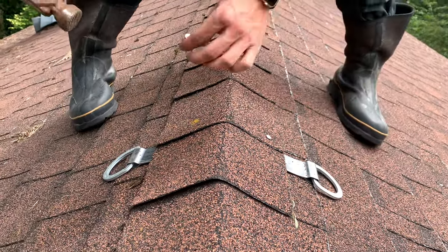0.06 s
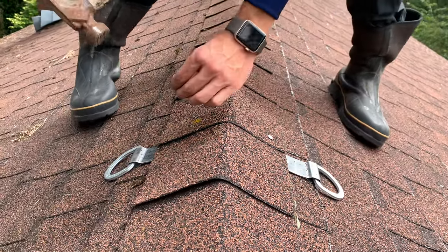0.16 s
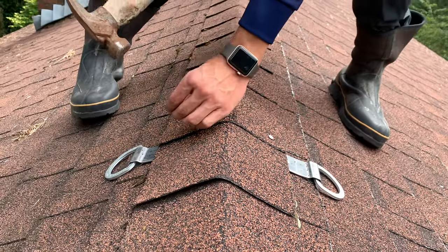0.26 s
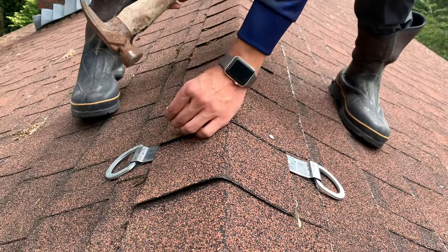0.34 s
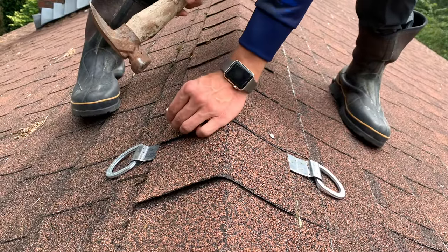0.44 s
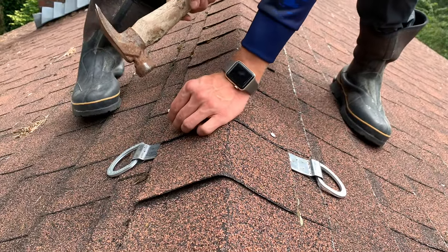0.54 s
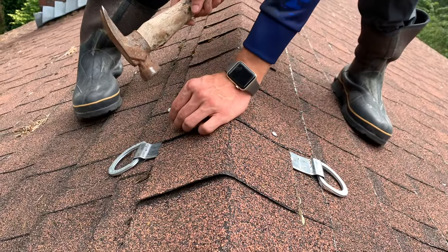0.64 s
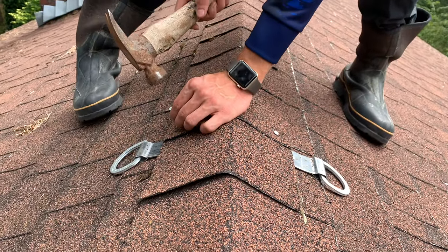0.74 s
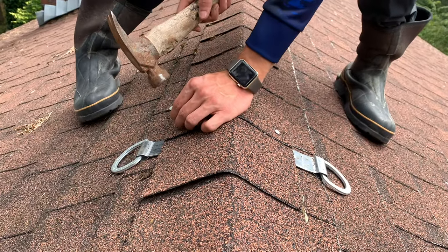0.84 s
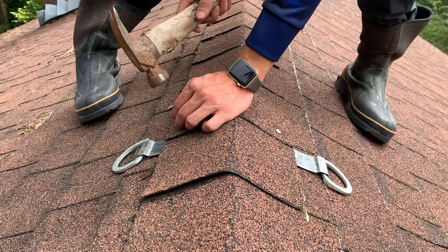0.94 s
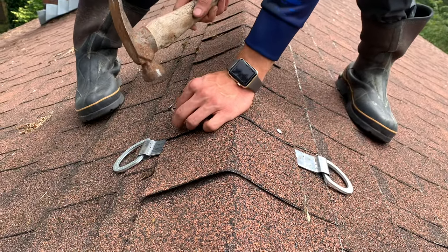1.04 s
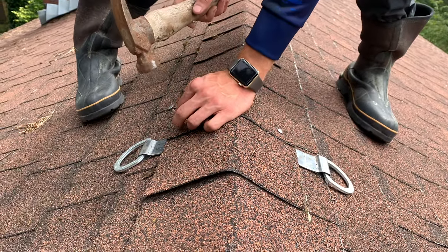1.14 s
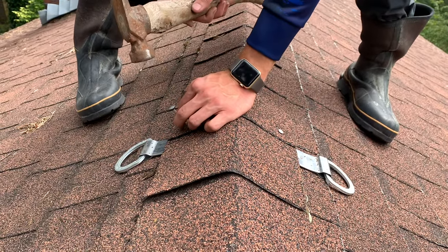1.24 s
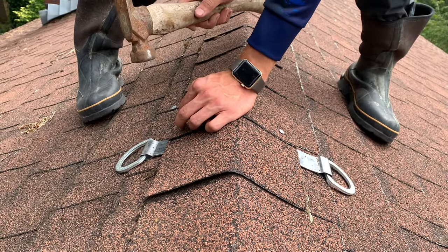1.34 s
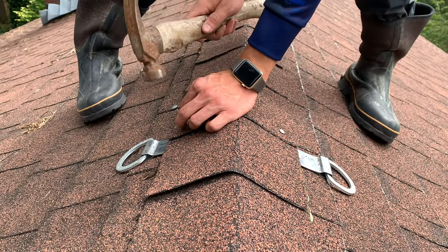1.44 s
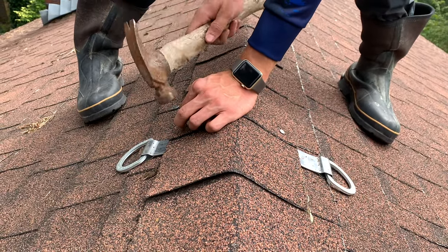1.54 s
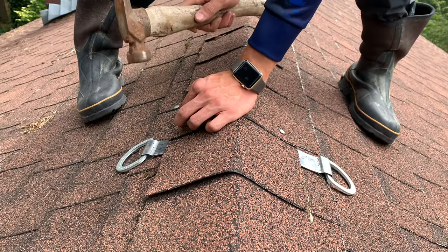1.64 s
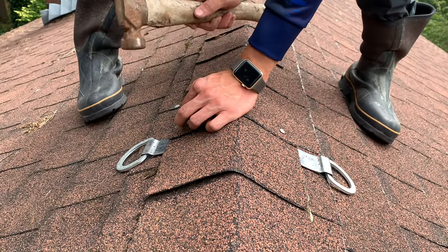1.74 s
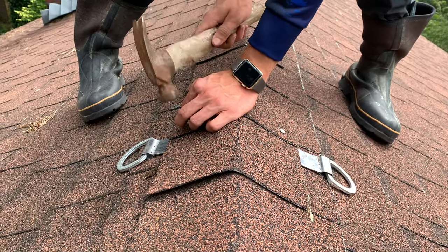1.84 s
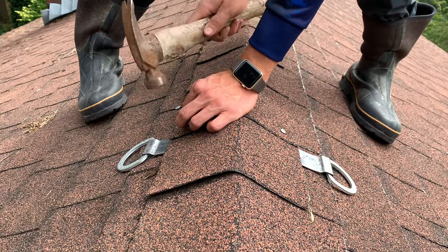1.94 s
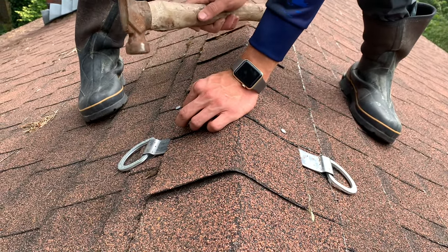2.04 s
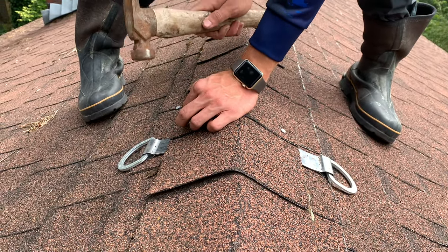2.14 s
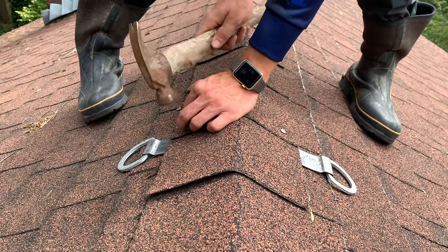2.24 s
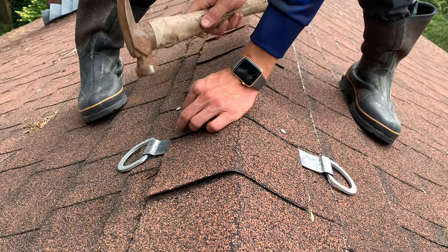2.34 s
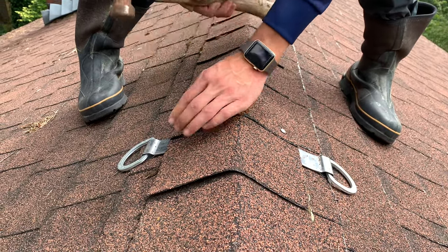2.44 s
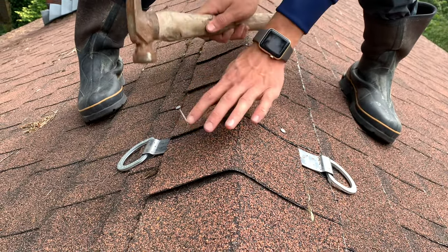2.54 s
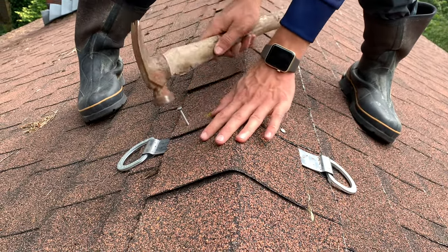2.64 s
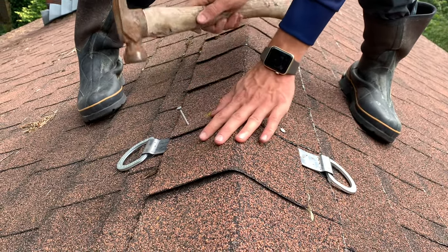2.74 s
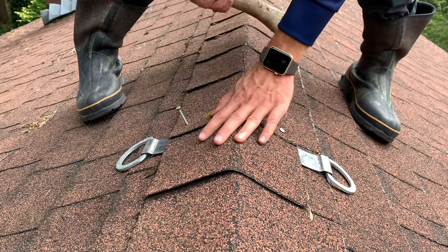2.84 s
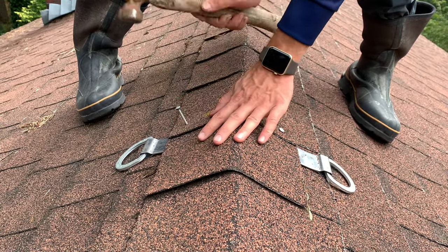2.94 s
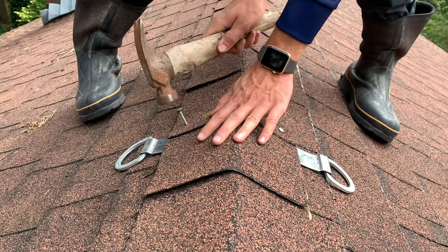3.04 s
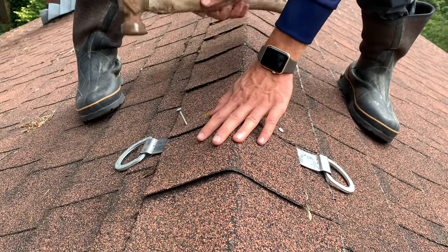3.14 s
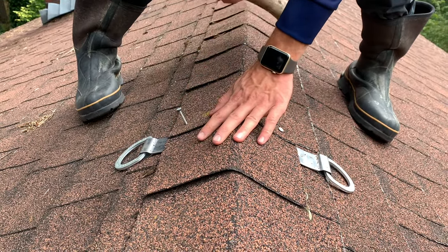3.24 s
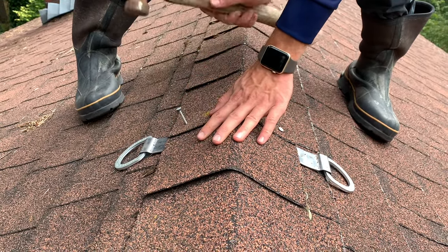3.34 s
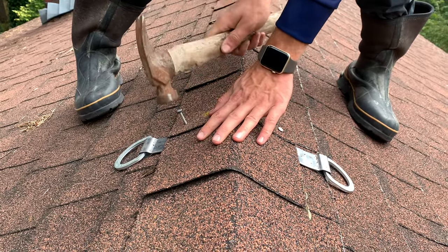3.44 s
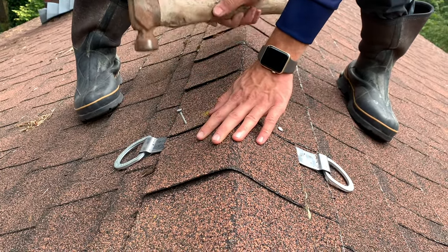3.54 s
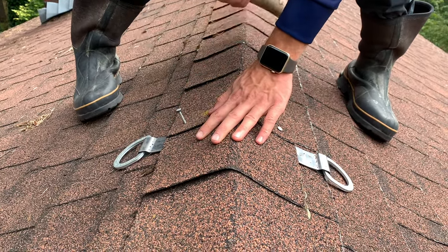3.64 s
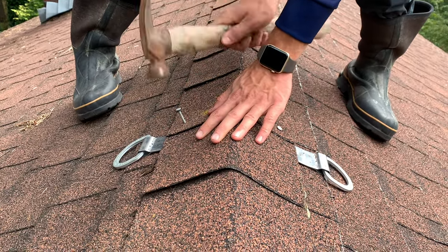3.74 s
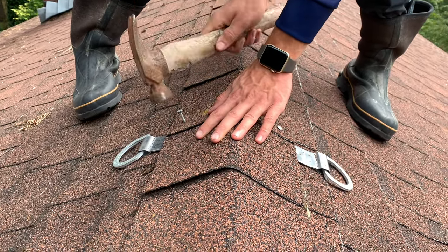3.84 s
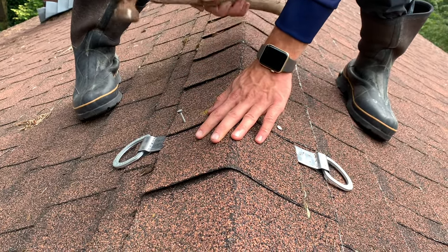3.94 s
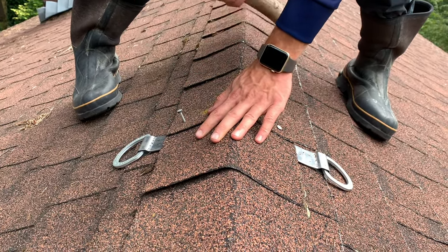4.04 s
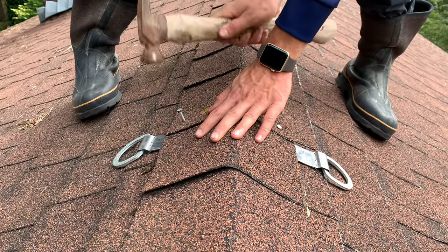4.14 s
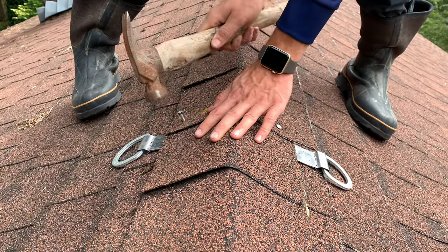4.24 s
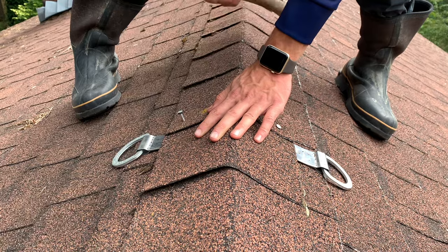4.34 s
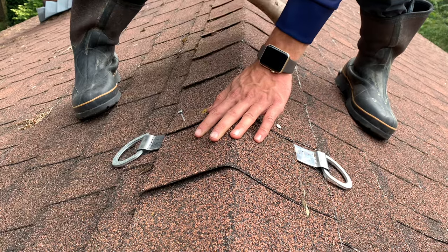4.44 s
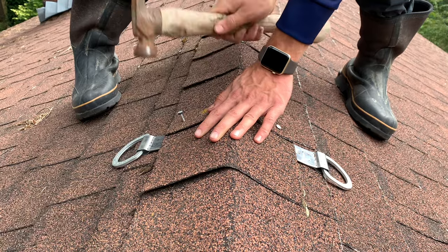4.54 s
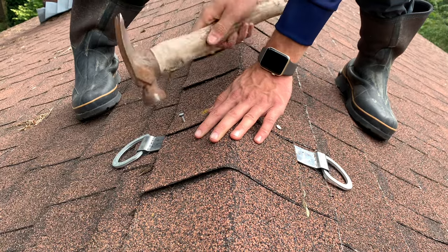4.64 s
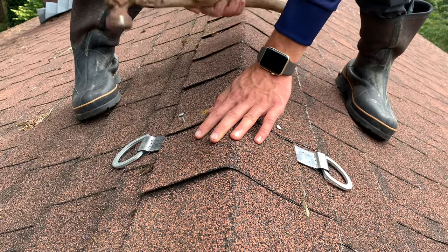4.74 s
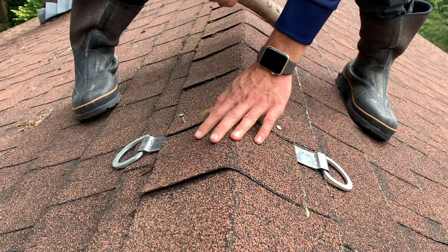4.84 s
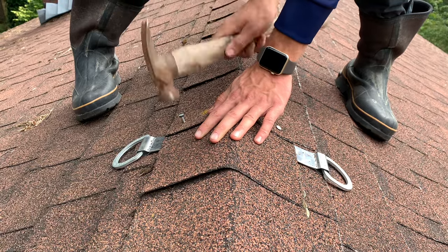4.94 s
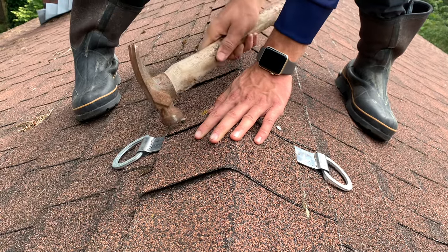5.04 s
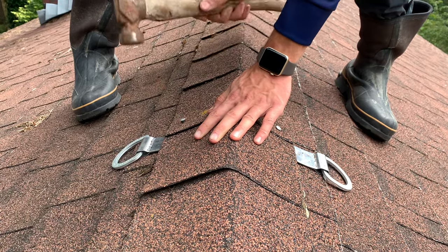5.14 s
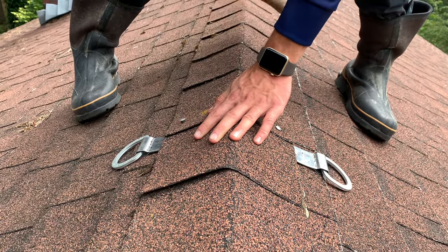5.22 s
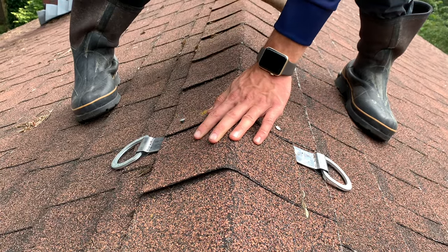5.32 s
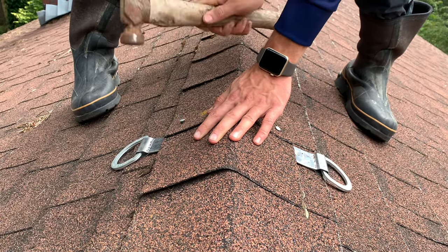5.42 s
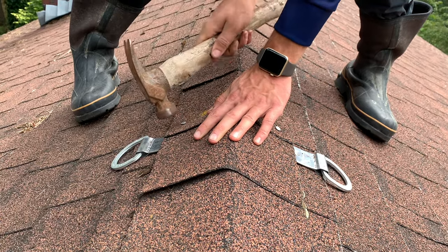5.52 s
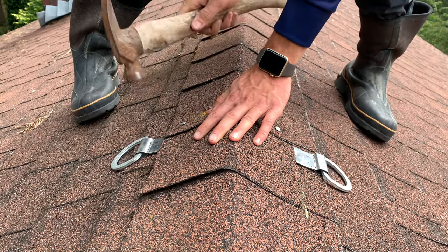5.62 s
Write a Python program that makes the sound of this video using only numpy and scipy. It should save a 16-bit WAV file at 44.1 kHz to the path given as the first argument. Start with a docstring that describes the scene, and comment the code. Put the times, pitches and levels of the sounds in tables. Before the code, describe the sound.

A hand scrapes over gritty roof shingle with small crackles and clicks. A steel hammer then taps a nail lightly and goes on striking at a steady pace, eleven hits in all. Each has a sharp metallic crack and a hollow wooden thump, the harder ones ringing briefly. The work is heard up close in still outdoor air, with very faint birds far away.

```python
"""On a roof in still air, a nail is driven through asphalt shingle into a plywood deck.
Five taps set it, six full blows sink it. Each blow cracks steel on steel and sends a bending wave
through the deck, whose bass arrives last as a falling thump. The roofer shifts his weight, a hand
scuffs over the gritty shingle, and small birds whistle far off."""
import sys
import numpy as np
from scipy import signal
from scipy.fft import rfft, irfft
from scipy.io import wavfile

SR = 44100
rng = np.random.default_rng(int(sys.argv[2]) if len(sys.argv) > 2 else 0)


def store_wav(level_fs):
    """Save 16-bit WAV to argv[1]."""
    pcm = np.round(np.clip(np.atleast_2d(level_fs), -1, 1) * 32767)
    wavfile.write(sys.argv[1], SR, pcm.T.astype(np.int16))


N = 250513
TIME = np.arange(N) / SR
SHOT = 2 ** 15   # samples in a one-shot
AGE = TIME[:SHOT]   # seconds since its trigger
APART = np.array([[1], [-1]])   # left up, right down


def from_db(db):
    """Decibels to gain."""
    return 10 ** (np.asarray(db) / 20)


def unit_rms(x):
    """Scale to rms 1."""
    return x / np.sqrt(np.mean(x ** 2) + 1e-20)


def unit_burst(x):
    """Scale a burst to the energy of 10 ms at rms 1."""
    return unit_rms(x) * np.sqrt(0.01 * SR / x.shape[-1])


def at_hz(points, hz):
    """Read a curve on a log-frequency axis."""
    known, values = np.transpose(points)
    return np.interp(np.log(hz + 1e-9), np.log(known), values)


def add(out, s, sound):
    """Mix a sound in at time s."""
    start = max(round(s * SR), 0)
    out[:, start:start + sound.shape[-1]] += sound[..., :max(N - start, 0)]


def bins(size=SHOT):
    """Frequencies of a real FFT."""
    return np.fft.rfftfreq(size, 1 / SR) + 1e-6


def band(centre_hz, width_hz):
    """Gain curve of a flat-topped resonance."""
    hz = bins()
    return 1 / np.sqrt(1 + ((hz ** 2 - centre_hz ** 2) / (hz * width_hz)) ** 4)


def noise(gain, alike, size=SHOT):
    """Stereo noise with a gain and a left-right correlation per frequency; rms 1."""
    mid, side = rfft(rng.standard_normal((2, size)))
    alike = np.clip(alike, -1, 1)
    stereo = np.sqrt(1 + alike) * mid + np.sqrt(1 - alike) * side * APART
    return unit_rms(irfft(gain * stereo, size))


def wander(rate_hz, alike, size=SHOT):
    """Low-passed noise to modulate with."""
    return noise(1 / (1 + (bins(size) / rate_hz) ** 2), alike, size)


def flicker(rate_hz, depth_db):
    """A gain that jumps about at random; rms 1."""
    return unit_rms(from_db(depth_db * np.clip(wander(rate_hz, 0.98)[0], -2, 2)))


def swell(rise_s, t60):
    """Envelope: quick attack, exponential decay."""
    return (1 - np.exp(-AGE / rise_s)) * from_db(-60 * np.minimum(AGE / t60, 4))


def hold(rise_s, length_s):
    """Envelope of a contact: quick attack, brief hold, release."""
    return (1 - np.exp(-AGE / rise_s)) * np.exp(-np.minimum(AGE / length_s, 10) ** 2)


# stereo image of diffuse sound: f/Hz, left-right correlation/0-1
CORRELATION = [(60, 0.91), (130, 0.93), (290, 0.7), (640, 0.47), (1400, 0), (7000, 0.32)]


def diffuse(eq, size=SHOT):
    """Noise from all around: nearly mono in the bass, wide higher up."""
    hz = bins(size)
    return noise(from_db(at_hz(eq, hz)), at_hz(CORRELATION, hz), size)


# EQ of the ambience: f/Hz, level/dB
AIR_EQ = [(26, -26.5), (45, -5.5), (108, 0), (265, -11.5), (464, -16), (1450, -25.5), (1770, -33),
          (2250, -25), (2800, -34), (3240, -25.5), (4900, -32.5), (6730, -35.5), (7410, -37.5),
          (13300, -51), (15000, -52.5)]


def still_air():
    """A faint, steady, bass-heavy bed of open air."""
    return from_db(-51) * diffuse(AIR_EQ, N)


# whistle cues: t/s, length/s, target note f/Hz, scoop/share of the note, level/dB
WHISTLE_CUES = [(2.062, 0.07, 2370, .01, -68.5), (2.707, 0.25, 4060, .05, -67.5),
                (3.192, .15, 2260, 0.04, -72), (3.2, 0.11, 5580, 0.026, -71.5),
                (3.298, 0.32, 3510, .03, -69), (3.673, 0.066, 4540, 0, -66), (5.165, 0.42, 4015, 0.1, -65)]


def whistling_birds():
    """Thin whistles scoop up toward a note, blurred by the trees."""
    out = np.zeros((2, N))
    scoop_s = 0.21
    for s, length, note_hz, scoop, db in WHISTLE_CUES:
        age = np.arange(int(length * SR)) / SR
        pitch = note_hz * (1 - scoop * np.maximum(1 - age / scoop_s, 0))
        tone = np.sin(2 * np.pi * np.cumsum(pitch) / SR)
        blur = .7 + .3 * wander(rate_hz=56, alike=0)[:, :len(age)]
        fade = np.sin(np.pi * age / length) ** 0.25
        add(out, s, from_db(db + 6.5) * fade * blur * tone)
    return out


# breakpoints of the buzzing song: t/s, f/Hz, level/dB
BUZZ_CURVE = [(3.948, 3610, -73), (4.152, 4220, -61.5), (4.42, 5540, -65), (4.902, 5200, -64),
              (5.152, 5200, -68)]


def buzzing_bird():
    """One long rising song: a tone ring-modulated by noise into a rasp."""
    s, hz, db = np.transpose(BUZZ_CURVE)
    rasp = wander(rate_hz=700, alike=0, size=N)
    fader = from_db(np.interp(TIME, s, db + 4, left=-np.inf, right=-np.inf))
    tone = np.sin(2 * np.pi * np.cumsum(np.interp(TIME, s, hz)) / SR)
    return fader * rasp * tone


def weight_shift():
    """The roofer settles his weight, and the deck murmurs."""
    out = np.zeros((2, N))
    add(out, 0, from_db(-36.5) * noise(band(39, 64), 0.96) * swell(0.0023, 1.03))
    return out


# EQ of a granule's click: f/Hz, level/dB
TICK_EQ = [(300, -12.5), (1400, 3), (3800, -3.5), (9000, -3.5), (13000, -12), (16000, -29.5)]


def grit_tick(db, pitch_hz):
    """One granule snaps: a broad click with a bell boost at its pitch, and its scatter off the roof."""
    size = SHOT // 8
    hz = bins(size)
    bell_db, bell_octaves = 13, 0.52
    eq_db = at_hz(TICK_EQ, hz) + bell_db * np.exp(-(np.log2(hz / pitch_hz) / bell_octaves) ** 2)
    decay = swell(.0003, .004) + from_db(-13) * swell(.001, .023)
    return from_db(db - 13.5) * unit_burst(noise(from_db(eq_db), 0.53, size) * decay[:size])


def grains(eq, per_s, spread_db):
    """Mineral granules click at random, in many sizes; rms 1."""
    sizes = from_db(spread_db * np.minimum(rng.exponential(1, SHOT), 4))
    triggers = rng.random(SHOT) < per_s / SR
    stereo = rng.choice([-1, 1], SHOT) + 0.61 * rng.standard_normal((2, SHOT))
    return unit_rms(irfft(rfft(triggers * sizes * stereo) * from_db(at_hz(eq, bins())), SHOT))


# EQs of skin hiss and of crunching grit: f/Hz, level/dB
HISS_EQ = [(400, -28.5), (1400, 2), (3500, -9), (6000, -5), (9000, -0.5), (13000, -12), (15000, -21)]
CRUNCH_EQ = [(400, -20.5), (900, -0.5), (1400, 0.5), (2400, 0.5), (3500, -5), (6000, -7), (12000, -10),
             (16000, -46)]
# hand strokes: t/s, length/s, hiss level/dB, crunch level/dB
STROKE_CUES = [(0, .14, -57.5, -52.5), (0.138, .16, -59, -66), (.31, 0.25, -67.5, -84),
               (0.726, 0.33, -65.5, -60), (0.9, 0.038, -53.5, -61), (1.085, 0.24, -64, -54),
               (2.37, 0.13, -64, -64), (2.535, 0.067, -65, -50.5), (3.538, 0.18, -72, -52)]
# grit snapping under the fingers: t/s, level/dB, f/Hz
TICK_CUES = [(0.1076, -23, 2350), (.357, -34, 9500), (0.492, -41, 8660), (.6335, -36.5, 3460),
             (0.8132, -23.5, 3700), (.92, -34, 3765), (.9637, -22.5, 3800), (1.037, -40.5, 4000),
             (1.1215, -28.5, 1880), (1.15, -27.5, 2600), (1.1966, -27, 1840), (1.221, -31.5, 2000),
             (1.257, -30.5, 2200), (1.272, -32, 2240), (1.4226, -29.5, 1800), (1.792, -37.5, 1780),
             (2.5406, -30, 2360), (2.574, -30, 2200), (3.6273, -30.5, 2280), (3.682, -32, 2470)]


def hand_scuffs():
    """Skin hisses over the shingle and rolls its granules in fits and starts; some snap free."""
    out = np.zeros((2, N))
    for s, length, hiss_db, crunch_db in STROKE_CUES:
        hiss = grains(HISS_EQ, per_s=16000, spread_db=3.5) * flicker(40, 2)
        crunch = grains(CRUNCH_EQ, per_s=1600, spread_db=8.8) * flicker(92, 1.86)
        stroke = np.interp(AGE, [0, .012, length, length + 0.017], [0, 1, 1, 0])
        add(out, s - .008, (from_db(hiss_db + 0.5) * hiss + from_db(crunch_db) * crunch) * stroke)
    for s, db, pitch_hz in TICK_CUES:
        add(out, s, grit_tick(db, pitch_hz))
    # small bright ticks, sprinkled over each stroke, poke out of its hiss
    ticks_per_s, centre_hz = 20, 7100
    for s, length, hiss_db, _ in STROKE_CUES:
        for when, strength, pitch in rng.random((round(length * ticks_per_s), 3)):
            tick = grit_tick(hiss_db + 17 + 8 * strength, centre_hz * 2 ** (pitch - .5))
            add(out, s + when * length, tick)
    return out


# EQs of a blow's early scatter, dying tail, low rumble and far echo: f/Hz, level/dB
SCATTER_EQ = [(150, -0.5), (400, 2), (1200, 4), (2000, -15), (2800, -13.5), (4500, -7.5), (8000, -17),
              (13000, -26.5), (16000, -39.5)]
TAIL_EQ = [(150, 11.5), (400, 5.5), (1300, 0), (2500, -19.5), (4500, -10), (8000, -25), (13000, -36.5),
           (16000, -42.5)]
RUMBLE_EQ = [(25, -3), (50, 10), (85, -2), (115, -2.5), (160, -0.5), (250, -18), (450, -18.5),
             (1000, -27.5), (3000, -46), (8000, -52)]
ECHO_EQ = [(150, -4), (350, 11), (600, 0), (1200, -14), (3000, -19.5), (6000, -29), (12000, -37.5)]
# thrown granules landing: t/s after the blow, level/dB at full force, f/Hz
HOP_CUES = [(.053, -32, 2800), (.065, -37, 1900)]


def add_aftermath(out, s, force_db, send_db, sway_db, clack_db):
    """After a blow the sound scatters and rumbles, grit settles and hops, and one far echo returns."""
    add(out, s + .004, from_db(send_db + 3) * diffuse(SCATTER_EQ) * flicker(450, 1.02) * swell(.00027, .043))
    add(out, s + .012, from_db(send_db - 4.5) * diffuse(TAIL_EQ) * flicker(200, 1.3) * swell(.0019, .09))
    add(out, s + .032, from_db(sway_db - 21) * diffuse(RUMBLE_EQ) * swell(.044, .83))
    settling_grit = grains(CRUNCH_EQ, per_s=1200, spread_db=4) * swell(.008, .11)
    add(out, s + .026, from_db(sway_db - 33) * settling_grit)
    for after_s, hop_db, hop_hz in HOP_CUES:
        add(out, s + after_s * rng.normal(1, 0.031), grit_tick(hop_db + force_db, hop_hz))
    add(out, s + .112, from_db(clack_db - 15.5) * diffuse(ECHO_EQ) * swell(.00068, .033))


# modes of the steel hammer head: f/Hz, level/dB, t60/s
HEAD_MODES = [(2320, -16, .2), (4690, -9, .2), (5496, -18, .2), (5978, -11, .22), (8134, -25, .25),
              (9507, -11, .15), (12200, -21, .42), (12510, -4, .12), (14880, -22, .18)]


def head_ring(ring_db):
    """The hammer head rings on; every blow shares its force among the modes differently."""
    hz, db, t60 = np.transpose(HEAD_MODES)[:, :, None, None]
    strength = from_db(ring_db + db + rng.normal(0, 1, db.shape))
    phase = rng.normal(0, .6, (len(HEAD_MODES), 2, 1))
    return np.sum(strength * from_db(-60 * AGE / t60) * np.sin(2 * np.pi * hz * AGE + phase), axis=0)


# body bands of the deck (sway, knock, clack, slap): f/Hz, width/Hz, pan to the left/dB
DECK_BANDS = [(76.65, 48, 3.5), (169, 108.4, 2.2), (589, 610, 3.5), (1089, 486, 4)]
# travel time of a bending wave: f/Hz, t/s
DECK_DELAY = [(35, 0.0579), (52, 0.061), (70, 0.03), (95, 0.021), (150, 0.012), (250, 0.0068), (500, 0.005),
              (1000, 0.0017), (2500, 0.00033)]


def deck_wave(levels_db):
    """Bending waves in the plywood are dispersive: the lows come late, so the thump falls in pitch."""
    delay = at_hz(DECK_DELAY, bins()) * (1 + 0.04 * rng.standard_normal())
    dispersion = np.exp(-2j * np.pi * np.cumsum(delay) * SR / SHOT)
    out = np.zeros((2, SHOT))
    for k, ((centre_hz, width_hz, pan_db), db) in enumerate(zip(DECK_BANDS, levels_db)):
        detune = 1 + 0.0071 * rng.standard_normal()
        packet = irfft(band(centre_hz * detune, width_hz) * dispersion) * swell(0.002, 3.1) * (AGE < .5)
        polarity = (-1) ** k   # neighbouring bands swing in opposite senses
        out += polarity * from_db(db + pan_db / 2 * APART) * unit_burst(packet)
    out[1] = np.roll(out[1], 2)   # reaches the left ear two samples early
    return out


# EQ of the steel-on-steel crack: f/Hz, level/dB
CRACK_EQ = [(1500, -6), (3000, -2.5), (5000, -7.5), (7300, -2.5), (9500, -8), (11500, -16.5), (16000, -64)]


def nail_strike(snap_db, shank_db, crack_db, tick_db, nail_hz):
    """The transient: steel meets steel, the shank shudders and wood fibres snap under the point."""
    snap = unit_burst(noise(band(2047, 920), 0.18) * swell(0.00048, 0.051))
    shudder = np.sin(2 * np.pi * nail_hz * AGE + rng.normal(0, .8, (2, 1))) * swell(.0006, .016)
    chatter = noise(band(4200, 1700), .2) * swell(.0004, .016)
    shank = .9 * unit_burst(shudder) + .65 * unit_burst(chatter)
    crack = unit_burst(noise(from_db(at_hz(CRACK_EQ, bins())), .7) * hold(.0002, .0023))
    tick = unit_burst(noise(band(11800, 3400), .65) * hold(.0003, .0019))
    return (from_db(snap_db) * snap + from_db(shank_db + 1.27 * APART) * shank
            + from_db(crack_db + 0.37 * APART) * crack + from_db(tick_db) * tick)


# hammer hits: t/s, force/dB, bite into the wood/dB, shank clink/dB, contact edge/dB,
# head ring level/dB, nail f/Hz
BLOW_CUES = [(1.555, -22.5, 2.5, -5.5, -0.5, -70, 4100), (1.9125, -10, -2, -4, 1, -63, 4350),
             (2.2624, -6.5, 2, -7.5, 2.5, -64, 4000), (2.6608, -8.5, -3, 0, -1, -56.5, 4140),
             (3.0637, -7, -8.5, -4, 0.5, -63.5, 5270), (3.464, -2, -0.5, -8.5, 2.5, -34, 5700),
             (3.837, -2.5, 1.5, -1.5, -6.5, -41, 4820), (4.2263, -2.5, 2, -7.5, -6, -33, 3690),
             (4.6309, -1.5, 2, -3, 5, -29.5, 4440), (5.028, -7, 2.5, -2.5, 0.5, -43, 4170),
             (5.5432, -8, 2, 0, 4, -57, 3930)]


def hammering():
    """Each blow sinks the nail by its force, so the clink gives way to the body of the deck."""
    out = np.zeros((2, N))
    driven = np.cumsum(from_db([blow[1] for blow in BLOW_CUES]))
    depths = driven / driven[-1]   # 1 when the nail is home
    for (s, force_db, bite_db, clink_db, edge_db, ring_db, nail_hz), depth in zip(BLOW_CUES, depths):
        # each layer tracks force and depth in its own way
        sway_db = -9.5 + 0.49 * force_db + 2.73 * depth
        knock_db = -4 + 0.99 * force_db + 0.48 * depth
        clack_db = -13 + 0.92 * force_db + 6.4 * depth
        slap_db = -20.5 + 0.3 * force_db + 7.34 * depth + bite_db
        snap_db = -28 + 0.31 * force_db + 6.53 * depth + bite_db
        shank_db = -15.5 + 0.033 * force_db - 7 * depth + clink_db
        crack_db = -21.5 - 0.089 * force_db - 3.5 * depth + 0.29 * edge_db
        tick_db = -35 - 0.1 * force_db + 0.84 * depth + edge_db
        body = deck_wave([sway_db, knock_db, clack_db, slap_db])
        strike = nail_strike(snap_db, shank_db, crack_db, tick_db, nail_hz)
        add(out, s, body + strike + head_ring(ring_db))
        send_db = np.mean([clack_db, slap_db, shank_db])   # feeds the scatter and the tail
        add_aftermath(out, s, force_db, send_db, sway_db, clack_db)
    return out


def scene():
    """Hammer and hand up close, birds and open air behind."""
    return hammering() + hand_scuffs() + weight_shift() + whistling_birds() + buzzing_bird() + still_air()


def record(dry):
    """Master chain: a soft clip on the loudest peaks, then a steep high cut."""
    ceiling, cutoff_hz = .95, 16600
    rounded = dry / (1 + np.abs(dry / ceiling) ** 6) ** (1 / 6)
    return signal.sosfilt(signal.ellip(10, .1, 80, cutoff_hz, fs=SR, output="sos"), rounded)


dry = scene()
out = record(dry)
store_wav(out)
```